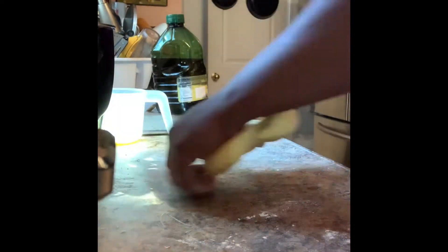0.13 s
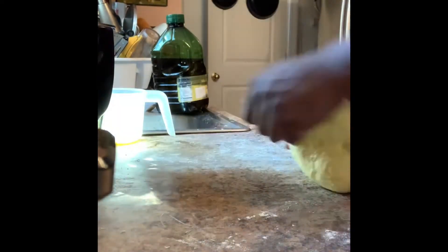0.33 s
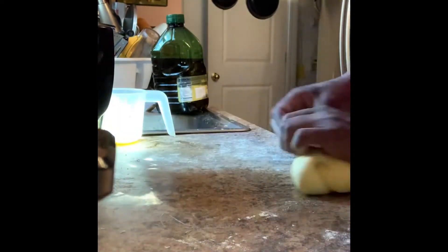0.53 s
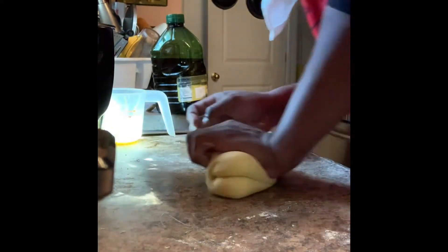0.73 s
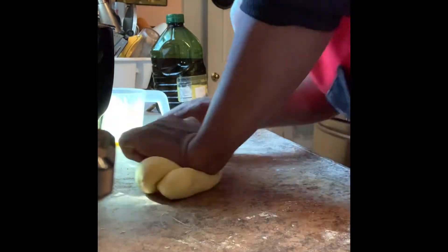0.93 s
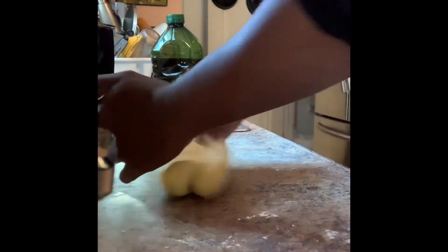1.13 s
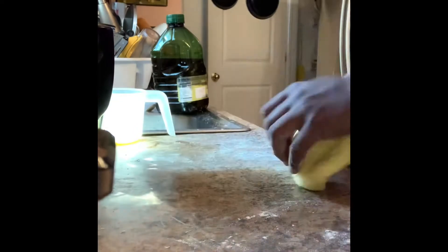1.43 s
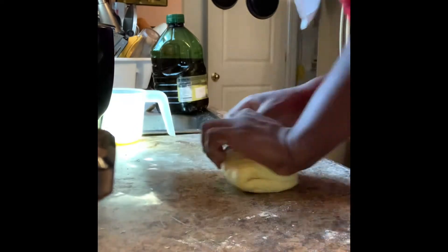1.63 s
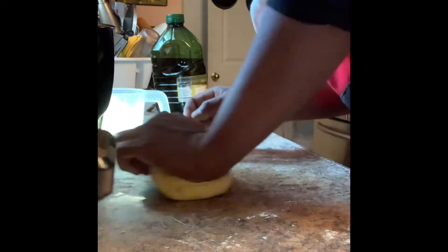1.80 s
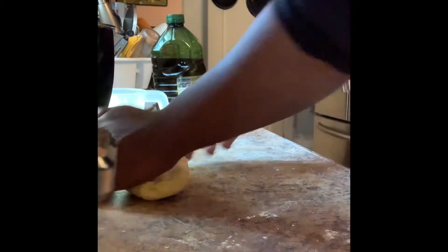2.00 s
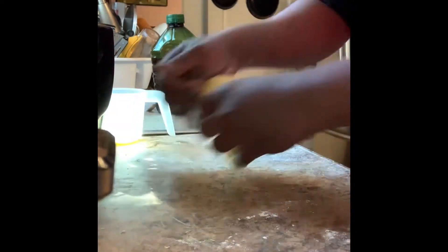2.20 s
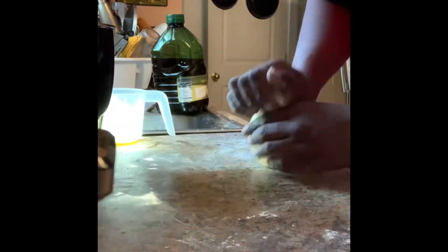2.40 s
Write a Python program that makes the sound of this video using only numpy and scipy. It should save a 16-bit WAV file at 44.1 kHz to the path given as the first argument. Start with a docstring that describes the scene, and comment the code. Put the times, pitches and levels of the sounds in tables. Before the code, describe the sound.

Dough kneading on a kitchen counter, heard close in quiet room air. Faint rubbing leads to a deep boom and soft pat at about 0.2 s, then hollow dragging and a quick floury brush near 0.5 s. A second push judders, creaks and knocks around 1.15 s. Softer thumps and drags follow, knuckles bump near 2.05 s, and a soft double-contact pat lands at 2.5 s.

```python
"""Hands knead soft dough on a kitchen countertop, about one big push a second, in quiet room air.
A strong push swells the counter's low modes with a boom and a pat; then the dough is drawn back hollowly and
skin brushes flour. A second push judders and creaks, and knuckles ring the counter; after another drawing back
knuckles bump it again, and one soft pat, landing in two quick contacts, ends it. Coloured noise rubs and
hisses throughout. The sound comes from one side and reaches the left microphone a moment later."""
import sys
import numpy as np
from scipy import signal
from scipy.fft import rfft, irfft
from scipy.io import wavfile

SR = 44100
rng = np.random.default_rng(int(sys.argv[2]) if len(sys.argv) > 2 else 0)


def generate_wav(sig):
    """Save sig (samples, or channels by samples) to the path in sys.argv[1] as 16-bit PCM at SR."""
    pcm = np.round(np.clip(np.atleast_2d(sig).T, -1, 1) * 32767).astype(np.int16)
    wavfile.write(sys.argv[1], SR, pcm)


N = 112454
T = np.arange(N) / SR   # time in seconds

# The counter's resonant modes. Each row: frequency in Hz, level in dB, time to full swing in seconds,
# 60 dB decay time of the after-ring in seconds, share of the knock (a factor).
COUNTER_MODES = [(60.87, -2.5, .037, 1, 0.045), (97.5, -16.5, 0.025, 0.11, 0),
                 (129.1, -4, 0.021, 0.29, 0.044), (185.2, -30, 0.024, 0.047, 0.67),
                 (234.8, -38, 0.026, .15, 0.99), (280.6, -32.5, 0.024, 0.15, 0.77),
                 (358, -34.5, 0.021, 0.096, 0.19), (545, -46, 0.028, 0.12, 0.58)]
RUB_ROOM_DB = -18.5   # room tail under rubs and creaks
COLOUR_WANDER_HZ = 20   # how fast the colour of rubs and creaks drifts


def from_db(db):
    """Decibels to gain."""
    return 10 ** (np.asarray(db) / 20)


def rms_one(x):
    """Scale to unit power."""
    return x / np.sqrt(np.mean(x ** 2) + 1e-20)


def noise(colour):
    """Noise shaped by a colour curve, falling 12 dB per octave beyond its ends; rms 1."""
    hz, db = np.transpose(colour)
    f = np.maximum(np.fft.rfftfreq(N, 1 / SR), 1)
    skirts = np.minimum(f / hz[0], 1) ** 2 * np.minimum(hz[-1] / f, 1) ** 2
    curve = from_db(np.interp(np.log(f), np.log(hz), db))
    return rms_one(irfft(rfft(rng.standard_normal(N)) * skirts * curve, N))


def flutter(rate_hz):
    """Smooth random wandering, rms 1: straight lines between two random points per cycle."""
    knots = 2 * rate_hz * T
    return rms_one(np.interp(knots, np.arange(8000), rng.standard_normal(8000)))


def swells(middles, lengths, levels_db, edge=2.12):
    """Loudness of a series of contacts, each rising and falling about its middle; edge steepens the ends."""
    power = 1e-20
    for middle, length, db in zip(middles, lengths, levels_db):
        power = power + from_db(db) ** 2 * np.exp(-np.abs(2 * (T - middle) / length) ** edge)
    return np.sqrt(power)


def at_microphones(x):
    """Sound from one side reaches the left microphone slightly later than the right."""
    left_lag_ms = 0.12
    f = np.fft.rfftfreq(2 * N, 1 / SR)
    delay = np.exp(-2j * np.pi * f * left_lag_ms * 1e-3)
    return np.array([irfft(rfft(x, 2 * N) * delay)[:N], x])


def kitchen(x):
    """A short, dull, diffuse room tail of decaying noise, different in each ear."""
    t60_s, dull_hz, build_s = 0.18, 3000, 0.006
    t = T[:SR // 2]
    tail = rng.standard_normal((2, len(t))) * from_db(-60 * t / t60_s) * np.minimum(t / build_s, 1)
    tail = signal.sosfilt(signal.butter(1, dull_hz, fs=SR, output="sos"), tail)
    tail = rms_one(tail) / np.sqrt(len(t))
    return signal.fftconvolve(x[None], tail, axes=1)[:, :N]


def thumps():
    """Each press swells the counter's modes, the deepest last, and leaves a faint after-ring."""
    # Dough pressed on the counter. Each row: start in seconds, level in dB, extra bass in dB,
    # extra knock in dB (weighted by each mode's share).
    presses = [(-0.010, -45.5, 1, 20.5), (0.037, -39, -6.5, 8.5), (0.213, -14, -10.5, -5.5),
               (0.304, -53.5, 7.5, 16), (0.469, -45.5, 5.5, -22), (0.642, -43.5, 0, 0),
               (0.723, -50, 4.5, -5), (0.779, -47.5, 3.5, -13), (0.846, -42, -3, 20), (0.949, -48, 4.5, 22),
               (1.131, -27, 0, 10.5), (1.172, -38.5, 4.5, 25.5), (1.355, -29.5, -5.5, 4),
               (1.441, -37, -12.5, -4), (1.512, -43.5, -7.5, -6), (1.546, -45, 5.5, -10),
               (1.626, -44, -2, 4), (1.722, -54.5, 3, 19), (1.827, -50.5, -1.5, -21),
               (1.976, -34, -1.5, 12.5), (2.108, -57, 10, 7), (2.267, -36, -5.5, -0.5),
               (2.398, -48, -3.5, -4)]
    swell_power, after_ring_db, bass_below_hz, left_louder_db = 4.6, -22, 85, 0.5
    out = np.zeros(N)
    for start, db, bass_db, knock_db in presses:
        span = (T > start) & (T < start + .5)
        t = T[span] - start
        for hz, mode_db, rise, t60, knock_share in COUNTER_MODES:
            swell = (t / rise * np.exp(1 - t / rise)) ** swell_power
            decay = np.exp(-np.log(1000) * np.maximum(t - rise, 0) / t60)
            after_ring = from_db(after_ring_db) * np.minimum(t / rise, 1) ** 2 * decay
            gain = from_db(db + mode_db + bass_db * (hz < bass_below_hz) + knock_db * knock_share)
            out[span] += gain * (swell + after_ring) * np.sin(2 * np.pi * hz * t)
    return at_microphones(out) * from_db([[left_louder_db / 2], [-left_louder_db / 2]])


def knocks():
    """Knuckles bump the counter through the dough; its upper modes ring and the hand damps them at once."""
    # Each row: start in seconds, level in dB before the rise and damping.
    bumps = [(0.865, -38), (1.141, -48), (1.186, -23), (1.194, -39.5), (2.063, -39), (2.080, -24.5)]
    rise_s, t60_s = 0.0045, 0.034
    out = 0
    for start, db in bumps:
        t = np.maximum(T - start, 0)
        ring = sum(share * from_db(mode_db) * np.sin(2 * np.pi * hz * t)
                   for hz, mode_db, _, _, share in COUNTER_MODES)
        ring = ring / np.abs(ring).max()
        out = out + from_db(db) * ring * np.minimum(t / rise_s, 1) * from_db(-60 * t / t60_s)
    return at_microphones(out)


def friction(colour, grain_db, grain_hz):
    """Noise of many tiny slips, clumped by the grain; its colour wanders as the contact shifts; rms 1."""
    wander_db = 3.5
    spectrum, f = rfft(noise(colour)), np.fft.rfftfreq(N, 1 / SR)
    centres = np.geomspace(400, 15000, 14)   # overlapping bands, each wandering by itself
    out = 0
    for share in np.eye(len(centres)):
        band = irfft(spectrum * np.interp(f, centres, share), N)
        out = out + band * from_db(wander_db * flutter(COLOUR_WANDER_HZ))
    return rms_one(out * from_db(grain_db * flutter(grain_hz)))


def strokes():
    """Dough judders and drags on the top while skin rubs and flour hisses, all as shaped noise."""
    # Hand and dough moving over the top. Each row: middle in seconds, length in seconds,
    # then the levels of judder, drag, rub and hiss in dB.
    moves = [(0.006, 0.097, -47.5, -65.5, -63.5, -66), (0.077, 0.07, -58.5, -76, -65.5, -64.5),
             (0.229, 0.059, -54.5, -66, -65.5, -70.5), (0.397, 0.13, -80.5, -69.5, -72, -83),
             (0.518, 0.094, -67.5, -76, -71, -80), (0.601, 0.058, -61, -72.5, -77, -69),
             (0.661, 0.06, -64, -75, -68.5, -68.5), (0.743, 0.037, -64.5, -68, -75.5, -94),
             (0.836, 0.08, -54.5, -73, -68, -72.5), (0.97, 0.038, -58, -69, -69, -67),
             (1.013, 0.13, -55, -64.5, -62.5, -70.5), (1.102, 0.038, -70, -67, -74, -61.5),
             (1.144, 0.031, -38, -62, -60.5, -76), (1.203, .042, -34, -63.5, -61.5, -58),
             (1.375, 0.072, -64, -72, -72.5, -80), (1.468, 0.055, -57, -65, -66.5, -73.5),
             (1.565, 0.085, -61.5, -69, -69.5, -77), (1.661, 0.055, -70, -73.5, -72.5, -76.5),
             (1.812, 0.12, -63.5, -77.5, -64, -73), (2.027, 0.09, -47.5, -80, -64, -62),
             (2.093, 0.062, -53.5, -69, -64, -64.5), (2.163, 0.056, -62, -64.5, -66.5, -80),
             (2.235, 0.048, -102, -68, -64, -66.5), (2.435, 0.23, -77.5, -71.5, -71, -78.5)]
    # Skin quickly brushing flour. Each row: middle in seconds, length in seconds, level in dB.
    flour_brushes = [(0.477, 0.021, -55.5), (0.5, 0.068, -65.5)]
    # Colours of the friction sounds. Each row: frequency in Hz, relative level per Hz in dB.
    judder_colour = [(40, -1.5), (65, -19.5), (90, 15), (130, -5), (200, 3.5), (280, -3.5), (350, -20),
                     (600, -49)]
    drag_colour = [(250, -17.5), (330, -1), (380, 6), (500, -1.5), (650, -2.5), (1100, -18)]
    rub_colour = [(400, -17.5), (880, -19.5), (1100, 3.5), (1650, -1), (2700, 0), (4000, 0.5), (6000, -53)]
    hiss_colour = [(1500, -1.5), (4000, -2.5), (6500, 0.5), (9000, -2), (15000, -13.5)]
    brush_colour = [(4000, -42), (7000, -6), (10000, 7), (11500, 0), (16000, -2.5)]
    cling_db, cling_hz = 0.5, 35   # unevenness as the dough clings and slips
    middle, length, judder_db, drag_db, rub_db, hiss_db = np.transpose(moves)
    judder = swells(middle, length, judder_db) * noise(judder_colour)
    drag = swells(middle, length, drag_db) * noise(drag_colour)
    # zero grain: the rub is not clumped
    rub = swells(middle, length, rub_db) * friction(rub_colour, grain_db=0.0, grain_hz=231.5)
    hiss = swells(middle, length, hiss_db) * friction(hiss_colour, grain_db=-2.0, grain_hz=500)
    slide = (drag + rub + hiss) * from_db(cling_db * flutter(cling_hz))
    brush = friction(brush_colour, grain_db=1.5, grain_hz=597)
    slide = slide + swells(*np.transpose(flour_brushes)) * brush
    return at_microphones(judder + slide) + from_db(RUB_ROOM_DB) * kitchen(slide)


def stick_slip(contacts, modes, width_hz, bunch_db):
    """Uneven bunches of slips ring narrow resonances, which shift as the contact moves."""
    slips_per_s, bunches_per_s = 670, 70
    mode_shift = .015   # spread of the drift, as a fraction of each frequency
    happens = rng.random(N) < slips_per_s / SR
    slips = happens * rng.uniform(0.86, 1, N) * rng.choice([-1, 1], N)
    slips = rms_one(slips * from_db(bunch_db * flutter(bunches_per_s)))
    slips = slips * swells(*np.transpose(contacts))
    out, r = 0, np.exp(-np.pi * width_hz / SR)
    for hz, db in modes:
        drifting_hz = hz * (1 + mode_shift * flutter(COLOUR_WANDER_HZ))
        turn = np.exp(2j * np.pi * np.cumsum(drifting_hz) / SR)
        # shift the mode down to 0 Hz, let it ring there, and shift it back
        ring = turn * signal.lfilter([1], [1, -r], slips / turn + 1e-18)
        out = out + from_db(db) * np.sqrt(1 - r * r) * np.imag(ring)
    return at_microphones(out) + from_db(RUB_ROOM_DB) * kitchen(out)


def creaks():
    """Dough sticks and slips: the top creaks under hard pushes and scrapes hollowly in the drawing back."""
    # Hard pushes, then drawings back. Each row: middle in seconds, length in seconds, level in dB.
    hard_pushes = [(0.072, .06, -59.5), (0.995, 0.07, -66), (1.193, 0.03, -50), (2.005, 0.065, -62),
                   (2.09, 0.05, -61)]
    draws_back = [(0.395, 0.1, -70), (0.525, 0.1, -69.5), (1.57, 0.08, -72)]
    # Resonances of the creak and of the hollow scrape. Each row: frequency in Hz, level in dB.
    creak_modes = [(715, -14), (1180, -2.5), (1450, -1), (1950, -8), (2590, -5.5)]
    hollow_modes = [(610, -3.5), (760, 1), (1230, -2), (2330, -1.5)]
    return (stick_slip(hard_pushes, creak_modes, width_hz=65, bunch_db=4)
            + stick_slip(draws_back, hollow_modes, width_hz=95, bunch_db=2.5))


def pats():
    """A palm meets the dough in a short, soft noise smack that the room answers; a flatter hand is brighter."""
    # Palm contacts; the last two make one pat. Each row: middle in seconds, length in seconds, level in dB,
    # room tail in dB, tilt in dB per octave.
    palm_contacts = [(0.236, 0.008, -46, -20, 0), (1.146, .005, -54, -9, -0.5),
                     (2.486, 0.007, -47.5, -13, -1), (2.494, 0.009, -46.5, -7, 1.5)]
    # Colour of the smack. Each row: frequency in Hz, relative level per Hz in dB.
    smack_colour = [(150, -18.5), (330, -2), (480, 6.5), (780, -9), (1100, 2), (1400, -4), (2000, -6.5),
                    (3600, -12), (6000, -28), (16000, -42)]
    out = 0
    for middle, length, db, room_db, tilt in palm_contacts:
        tilted = [(hz, level + tilt * np.log2(hz)) for hz, level in smack_colour]
        smack = noise(tilted) * swells([middle], [length], [db], edge=1.2)
        out = out + at_microphones(smack) + from_db(room_db) * kitchen(smack)
    return out


def air():
    """The quiet kitchen: steady coloured noise."""
    # Colour of the air. Each row: frequency in Hz, relative level per Hz in dB.
    air_colour = [(25, -22.5), (60, -4), (130, 4), (300, -22), (800, -47), (3000, -37.5), (8000, -40.5),
                  (16000, -33.5)]
    air_db = -63.5
    return from_db(air_db) * at_microphones(noise(air_colour))


def scene():
    """Everything at the two microphones."""
    return thumps() + knocks() + strokes() + creaks() + pats() + air()


def record(dry):
    """The left-right difference is raised, most in the middle range, and the top is cut steeply."""
    # Stereo widening. Each row: frequency in Hz, gain of the left-right difference in dB.
    side_gain = [(60, 2), (150, 8.5), (520, 13.5), (720, 10.5), (880, 20), (1100, 8), (2000, 0.5),
                 (4000, -2)]
    cutoff_hz = 15800
    hz, db = np.transpose(side_gain)
    f = np.maximum(np.fft.rfftfreq(2 * N, 1 / SR), 1)
    mid, side = (dry[0] + dry[1]) / 2, (dry[0] - dry[1]) / 2
    widening = from_db(np.interp(np.log(f), np.log(hz), db))
    side = irfft(rfft(side, 2 * N) * widening)[:N]
    top_cut = signal.ellip(12, .1, 90, cutoff_hz, fs=SR, output="sos")
    return signal.sosfilt(top_cut, np.array([mid + side, mid - side]))


dry = scene()
out = record(dry)
generate_wav(out)
```